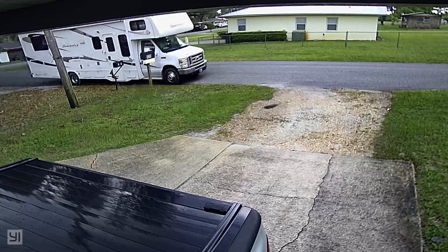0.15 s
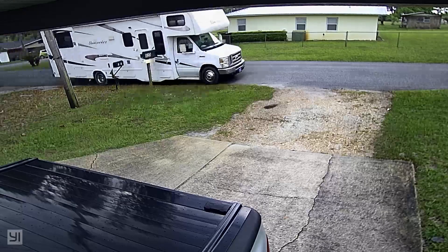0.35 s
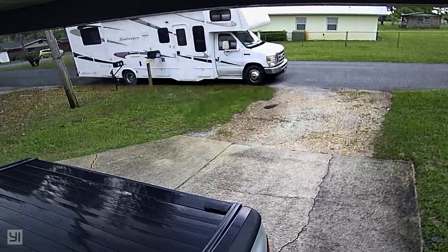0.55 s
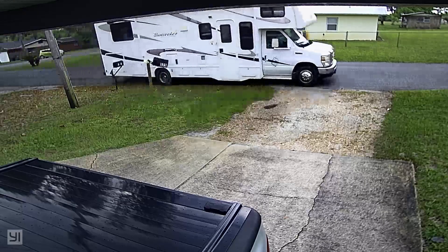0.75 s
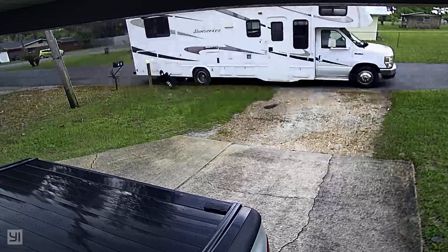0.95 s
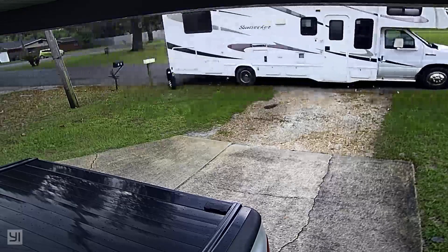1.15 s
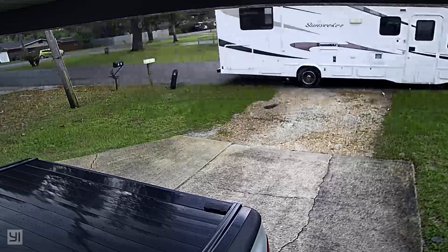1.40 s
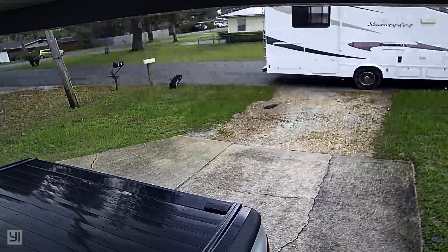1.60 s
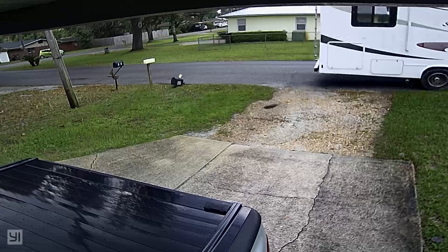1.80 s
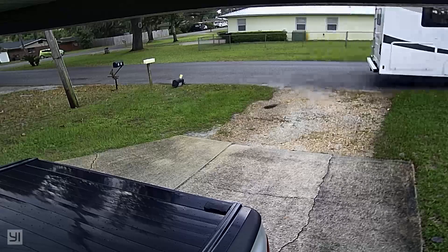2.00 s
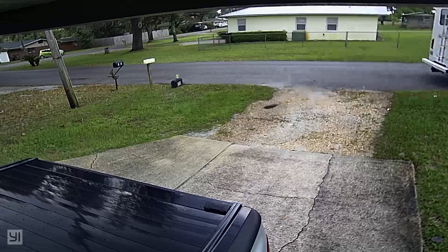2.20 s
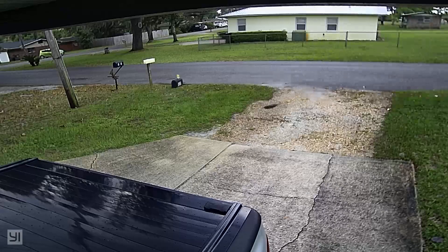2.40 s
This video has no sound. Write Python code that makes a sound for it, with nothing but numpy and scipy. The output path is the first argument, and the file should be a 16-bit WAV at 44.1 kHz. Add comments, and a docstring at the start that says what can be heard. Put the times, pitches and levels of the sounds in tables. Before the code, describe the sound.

A mailbox crash: engine and tyre noise is briefly heard, then from 0.2 to 0.4 seconds a motorhome hits with dense, crunching sheet-metal blows and a hollow boom. Gritty rattle and bright metallic clinks follow until 0.8. Wreckage lands near 1.05, fragments tick around 1.3, and it thuds again at 1.53 to 1.8. Tyre roar fades with faint hoots by 2.0, leaving quiet air, tiny ticks and a faint chirp at 2.5.

```python
"""A motorhome's engine and tyres come past, heard from a house across the lawn, over still outdoor air.
It clips a roadside mailbox: crackling bursts ring the sheet metal, and its panels boom and flex.
Loose parts ring as dying sines, then the wreck lands and tumbles among fragments and rattling grit.
The vehicle fades with two hoots, and a faint chirp follows in the distance.
Ground, walls, house fronts and trees echo the crash into a narrow-band microphone that rounds off peaks."""
import sys
import numpy as np
from scipy import signal
from scipy.io import wavfile
from scipy.ndimage import uniform_filter1d

SR = 44100
rng = np.random.default_rng(int(sys.argv[2]) if len(sys.argv) > 2 else 0)


def pcm_store(signal):
    """Save signal as 16-bit PCM."""
    levels = np.round(np.clip(np.atleast_2d(signal), -1, 1) * 32767)
    wavfile.write(sys.argv[1], SR, levels.astype(np.int16).T)


N = 112454
T = np.arange(N) / SR  # time in seconds

# The passing vehicle. Each row: time in seconds, engine level in dB, tyre level in dB.
PASS_LEVELS = [(0, -46, -52), (.2, -41, -54), (.6, -49.5, -46.5), (.95, -52, -48.5), (1.25, -54, -52),
               (1.38, -62, -49.5), (1.47, -52.5, -42.5), (1.62, -71, -46), (1.78, -82, -48.5),
               (1.9, -83.5, -54), (2.1, -70, -66), (2.55, -76.5, -76)]
# Colour of the engine. Each row: frequency in Hz, relative density in dB.
ENGINE_SPECTRUM = [(35, -89.5), (60, -54.5), (93, -27), (133, -14.5), (335, -2.5), (531, -11.5), (590, -5),
                   (774, -25), (1150, -6), (1360, -12.5), (1750, -7.5), (2610, -18.5), (3580, -20.5),
                   (7300, -35.5), (9000, -53), (11700, -68.5), (19800, -120)]
# Colour of the tyre roar. Each row: frequency in Hz, relative density in dB.
TYRE_SPECTRUM = [(60, -34), (130, -6), (300, -5.5), (460, -4.5), (575, 7.5), (690, -4.5), (820, 3.5),
                 (1030, 2.5), (1200, -7.5), (1400, -24), (1750, -14.5), (2200, -33), (4000, -29),
                 (7500, -26.5), (9000, -45)]
# Engine tones on the approach. Each row: mean pitch in Hz, level in dB at full strength.
ENGINE_TONES = [(335, -51.5), (608, -47.5)]
# Short hoots of resonance as the vehicle leaves. Each row: start in seconds, length in seconds,
# pitch in Hz, peak level in dB.
HOOTS = [(1.817, 0.065, 588, -47.5), (2.001, 0.048, 578, -52)]
# Colour of the outdoor air. Each row: frequency in Hz, relative density in dB.
AIR_SPECTRUM = [(35, -86), (60, -51.5), (145, -4), (266, -6), (314, -13), (440, -2.5), (488, -14),
                (975, -3.5), (2960, -16), (3970, -21.5), (7940, -27), (9000, -42.5), (11700, -82),
                (19800, -120)]
# Faint chirps in the distance. Each row: start in seconds, length in seconds, pitch in Hz, peak level in dB.
CHIRPS = [(2.529, 0.014, 2490, -57)]
# Rattling grit. Each row: time in seconds, level in dB.
GRIT_LEVELS = [(0, -57), (.13, -60.5), (.2, -53), (.45, -36), (.62, -43), (.82, -50), (.95, -52),
               (1.2, -53.5), (1.4, -52.5), (1.5, -51), (1.58, -85), (1.77, -74.5), (1.86, -65), (2.05, -76),
               (2.55, -85)]
# Colour of the grit. Each row: frequency in Hz, relative density in dB.
GRIT_SPECTRUM = [(100, -28.5), (900, -6.5), (1800, -3), (2400, 0.5), (3500, 3.5), (4300, -2), (5000, -8),
                 (7500, -4.5), (9000, -27.5)]
# Knocks on two loose metal parts. Each row: start in seconds, level in dB.
BRACKET_HITS = [(.575, -39.5), (.789, -36)]
ROD_HITS = [(.678, -36.5), (.719, -39)]
# Modes of those parts. Each row: pitch in Hz, relative level in dB, time to fall 60 dB in seconds.
BRACKET_MODES = [(2812, 0.5, 0.34), (2970, -19, .15), (3492, -1, 0.24), (4440, -12, 0.17), (7140, 0, .11)]
ROD_MODES = [(2639, 1.5, .35), (2670, -7, 0.24), (6780, -2, 0.16), (4027, -8, .15)]
# Small fragments falling on the road. Each row: start in seconds, level in dB, decay in seconds.
FRAGMENTS = [(1.204, -45, 0.0055), (1.262, -46, 0.003), (1.279, -44.5, 0.012), (1.291, -35.5, 0.0056),
             (1.421, -49, 0.017), (1.441, -48, 0.024), (1.642, -37, 0.0056), (1.676, -65, 0.0072),
             (1.778, -57, .025), (2.206, -68.5, 0.0046), (2.354, -63.5, .004), (2.467, -63, .004)]
# Colour of a fragment. Each row: frequency in Hz, relative density in dB.
FRAGMENT_SPECTRUM = [(100, -34), (1200, -12), (2500, -18), (3900, 0), (5000, -16), (7400, -12), (9000, -34)]
# The vehicle strikes the box. Each row: start in seconds, level in dB before the shelves,
# crunch decay in seconds, bass shelf in dB, treble shelf in dB.
BLOWS = [(.209, -29.5, 0.0077, -5, 1), (.215, -17.5, 0.016, -6.5, 6), (.231, -13.5, .017, -8.5, -8),
         (.253, -24.5, 0.024, 0, 3), (.291, -20, 0.0061, -2, 4.5), (.299, -11.5, 0.0031, -9.5, 0.5),
         (.308, -13, 0.013, -3, -2.5), (.332, -19, 0.037, 0.5, 1), (.363, -20, 0.037, -1, -0.5),
         (.418, -38, 0.021, 3.5, -7.5), (.47, -31, 0.051, -4.5, -5), (.566, -28, 0.0058, -14, -12),
         (.637, -37.5, 0.023, -2.5, -0.5), (.668, -35.5, 0.035, -18, -0.5), (.752, -37, 0.024, -15, 8),
         (.768, -32, 0.023, -11, -10)]
# Colour of the crunch. Each row: frequency in Hz, relative density in dB.
CRUNCH_SPECTRUM = [(60, -49.5), (130, -16), (260, -9.5), (340, -6.5), (480, -2.5), (600, -4), (745, -10),
                   (1130, -3.5), (1300, -7), (1750, -1), (2050, -3), (2600, -8.5), (3800, -6),
                   (4600, -14.5), (5700, -14.5), (7100, -12), (8100, -20.5), (9000, -42.5)]
# The wreck hits the ground and tumbles. Each row: start in seconds, level in dB before the shelves,
# decay in seconds, bass shelf in dB, treble shelf in dB.
LANDINGS = [(1.042, -34, 0.0037, -1, 0.5), (1.048, -34.5, 0.018, -5, 1), (1.057, -38.5, 0.054, 7, -0.5),
            (1.074, -43, 0.038, -4.5, -5), (1.175, -51.5, 0.022, 10.5, 10.5), (1.529, -35, 0.0055, -5, -8),
            (1.5445, -28.5, 0.0036, -0.5, -7.5), (1.603, -43, 0.0023, 14, -22),
            (1.662, -40.5, 0.012, 2.5, -4.5), (1.799, -44, 0.023, 13.5, -2)]
# Colour of a landing. Each row: frequency in Hz, relative density in dB.
THUD_SPECTRUM = [(60, -37), (140, -18.5), (320, -4), (400, -7), (560, -2), (760, -11), (900, -2.5),
                 (1130, -2), (1400, -10.5), (1780, -5), (2500, -8.5), (3700, -7), (5000, -14.5),
                 (7300, -12.5), (9000, -34.5)]
# Sheet metal of the box. Each row: pitch in Hz, relative level in dB, time to fall 60 dB in seconds.
BOX_MODES = [(482.3, -7, 0.64), (543, -2, 0.4), (969, 0.5, 0.4), (1196, -0.5, 0.28), (1310, -5.5, 0.18),
             (1650, -13, 0.14), (1700, -19, 0.46), (1758.4, -1.5, .6), (1861, 12, 0.12), (2260, -0.5, 0.12),
             (2498, -12.5, 0.27), (2930, -14, 0.12), (3450, -19.5, 0.11), (3703, -3, 0.1)]
# The dented wall flexes. Each row: start in seconds, level in dB before swell and decay, pitch in Hz.
FLEXES = [(.238, -23, 444), (.405, -21, 440.4), (.45, -37, 467)]
# The broad panel gives way. Each row: start in seconds, level in dB applied to the panel modes.
BOOMS = [(.331, -21.5), (0.344, -15)]
# Modes of that panel. Each row: pitch in Hz, relative level in dB, time to fall 60 dB in seconds.
PANEL_MODES = [(263.5, 4, 0.12), (301.5, -5, .17), (226, -9.5, 0.16), (378, -14.5, 0.18), (462.6, -17, 0.3)]
# Echoes off the ground and nearby walls. Each row: delay in seconds, level in dB.
WALL_ECHOES = [(.0031, -17), (.0083, -15), (.017, -19.5)]
# Echo decay of the yard. Each row: frequency in Hz, time to fall 60 dB in seconds.
YARD_DECAY = [(100, 0.3), (300, 0.55), (1000, 0.35), (2000, 0.77), (4000, 0.29), (8000, 0.41)]

TONE_WAVER = .008  # rms pitch wander as a fraction of the pitch
AIR_DB = -65
ATTACK_S, FRAGMENT_RISE_S, PANEL_RISE_S = .0015, .0017, .0088
CRACKS_PER_S = 1500  # average rate within a contact
BASS_HZ, TREBLE_HZ = 450, 3500  # shelf corners
OVERTONE_LOW_HZ, OVERTONE_HIGH_HZ, OVERTONE_T60_S = 700.2, 7694, .22
RING_DB, OVERTONES_DB = -18.5, -25
FLEX_T60_S = .22
WALL_DULL_HZ, YARD_DB = 5000, -12
EDGE_HZ = 8900  # upper edge of the microphone's band
DIP_S, DIP_WIDTH_S, DIP_DB = .1425, .0045, -13.5  # centre, half-width and depth of a level dip


def amp(db):
    """Amplitude from decibels."""
    return 10 ** (np.asarray(db) / 20)


def unit(x):
    """Scale to an rms of one."""
    return x / np.sqrt(np.mean(x ** 2) + 1e-20)


def read(points, hz):
    """Read a table of values along a logarithmic frequency axis."""
    f, value = np.transpose(points)
    return np.interp(np.log(hz + 1), np.log(f + 1), value)


def level(table, axis=1):
    """Gain over time from one dB column of a curve."""
    rows = np.array(table)
    return amp(np.interp(T, rows[:, 0], rows[:, axis]))


def add(mix, start_s, sound):
    """Mix a sound in place from its start time, cut at the end of the scene."""
    part = mix[round(start_s * SR):][:len(sound)]
    part += sound[:len(part)]


def colour(x, spectrum, bass_db=0, treble_db=0):
    """Minimum-phase filter, set to unit energy before a shelf is added at each end."""
    hz = abs(np.fft.fftfreq(4096, 1 / SR))
    rolloff = np.where(hz > EDGE_HZ, EDGE_HZ / (hz + 1), 1) ** 2
    gain = unit(amp(read(spectrum, hz)) * rolloff)
    bass = bass_db / (1 + (hz / BASS_HZ) ** 4)
    treble = treble_db * (1 - 1 / (1 + (hz / TREBLE_HZ) ** 4))
    gain = gain * amp(bass + treble)
    # The Hilbert transform of the log gain gives the phase that makes the filter causal.
    response = np.exp(np.conj(signal.hilbert(np.log(gain + 1e-6))))
    taps = np.fft.ifft(response).real
    return signal.fftconvolve(x, taps[:len(taps) // 2])[:len(x)]


def crackle(size, per_s, spread_db, hiss):
    """Random cracks of uneven size over a fine rasp."""
    heights = amp(spread_db * np.minimum(rng.exponential(1, size), 3))
    heights = heights * rng.choice([-1, 1], size)
    cracks = heights * (rng.random(size) < per_s / SR)
    return unit(unit(cracks) + hiss * rng.standard_normal(size))


def burst(level_db, decay_s, hiss, rise_s=ATTACK_S):
    """One contact: a quick rise and a dying run of cracks."""
    t = T[:SR // 2]
    rise = 1 - np.exp(-t / rise_s)
    fall = np.exp(-(t / decay_s) ** 1.286 / 2)
    return amp(level_db) * rise * fall * crackle(len(t), CRACKS_PER_S, spread_db=2.5, hiss=hiss)


def ring(modes):
    """Dying sines of a struck object."""
    t = T[:SR]
    return sum(amp(db - 60 * t / t60) * np.sin(2 * np.pi * hz * t) for hz, db, t60 in modes)


def blip(length_s, hz, db):
    """A short tone that swells and fades."""
    t = T[T < length_s]
    return amp(db) * np.sin(np.pi * t / length_s) ** 2 * np.sin(2 * np.pi * hz * t)


def vehicle():
    """The engine leads, with two wavering tones; gritty tyre roar follows and hoots as it fades."""
    engine = colour(crackle(N, 900, spread_db=1, hiss=1), ENGINE_SPECTRUM)
    drive = level(PASS_LEVELS, axis=1)
    tones = np.zeros(N)
    for hz, db in ENGINE_TONES:
        waver = unit(uniform_filter1d(rng.standard_normal(N), size=1500))
        pitch_hz = hz * (1 + TONE_WAVER * waver)
        tones += amp(db) * np.sin(2 * np.pi * np.cumsum(pitch_hz) / SR)
    # The tones fade once the engine falls below its opening level.
    tone_fade = np.minimum(drive / drive[0], 1) ** 2
    roar = colour(crackle(N, 500, spread_db=5, hiss=1.0), TYRE_SPECTRUM)
    tyres = level(PASS_LEVELS, axis=2) * roar
    for start_s, *hoot in HOOTS:
        add(tyres, start_s, blip(*hoot))
    return drive * engine + tones * tone_fade + tyres


def background():
    """Still outdoor air, made of coloured noise, with a faint chirp."""
    air = amp(AIR_DB) * colour(rng.standard_normal(N), AIR_SPECTRUM)
    for start_s, *chirp in CHIRPS:
        add(air, start_s, blip(*chirp))
    return air


def debris():
    """A spray of grit and falling fragments, both crackling, with loose parts ringing at their modes."""
    grit = colour(crackle(N, 970, spread_db=3, hiss=0.96), GRIT_SPECTRUM)
    out = level(GRIT_LEVELS) * grit
    for hits, modes in (BRACKET_HITS, BRACKET_MODES), (ROD_HITS, ROD_MODES):
        for start_s, db in hits:
            add(out, start_s, amp(db) * ring(modes))
    for start_s, db, decay_s in FRAGMENTS:
        fragment = burst(db, decay_s, hiss=.6, rise_s=FRAGMENT_RISE_S)
        add(out, start_s, colour(fragment, FRAGMENT_SPECTRUM))
    return out


def mailbox():
    """Crunching blows and landings, all ringing the same sheet metal; its panels boom and flex."""
    crunch = np.zeros(N)
    for table, spectrum in (BLOWS, CRUNCH_SPECTRUM), (LANDINGS, THUD_SPECTRUM):
        for start_s, db, decay_s, bass_db, treble_db in table:
            contact = burst(db, decay_s, hiss=0.84)
            add(crunch, start_s, colour(contact, spectrum, bass_db, treble_db))
    # Many weak modes of the crumpled metal, unevenly spaced.
    pitches = np.geomspace(OVERTONE_LOW_HZ, OVERTONE_HIGH_HZ, 48) * rng.uniform(.97, 1.03, 48)
    overtones = [(hz, 0, OVERTONE_T60_S) for hz in pitches]
    out = crunch.copy()
    for metal, db in (ring(BOX_MODES), RING_DB), (ring(overtones), OVERTONES_DB):
        out += amp(db) * signal.fftconvolve(crunch, metal / np.linalg.norm(metal))[:N]
    swell = 1 - np.exp(-(T[:SR] / PANEL_RISE_S) ** 2)
    for start_s, db in BOOMS:
        add(out, start_s, amp(db) * ring(PANEL_MODES) * swell)
    for start_s, db, hz in FLEXES:
        add(out, start_s, ring([(hz, db, FLEX_T60_S)]) * swell)
    return out


def walls(x):
    """The direct sound and a few early, duller copies from the ground and nearby walls."""
    out = x.copy()
    dull = signal.sosfilt(signal.butter(1, WALL_DULL_HZ, fs=SR, output="sos"), x)
    for delay_s, db in WALL_ECHOES:
        add(out, delay_s, amp(db) * dull)
    return out


def yard(x):
    """Scattered echoes from house fronts and trees, each band dying at its own speed."""
    arrivals = rng.choice([-1., 1.], SR) * (rng.random(SR) < 2000 / SR)  # about 2000 a second
    taps = arrivals * np.minimum(T[:SR] / 0.014, 1)  # builds up over 14 ms
    hz, t, bands = signal.stft(taps, SR, nperseg=256)
    decay = amp(-60 * t / read(YARD_DECAY, hz)[:, None])
    tail = signal.istft(bands * decay, SR, nperseg=256)[1]
    return signal.fftconvolve(x, tail / np.linalg.norm(tail))[:N]


def scene():
    """The crash and its echoes over the passing vehicle and the outdoor air."""
    crash = mailbox() + debris()
    echoing = walls(crash) + amp(YARD_DB) * yard(crash)
    return (echoing + vehicle() + background())[None]


def record(dry):
    """A small microphone rounds off peaks, dips briefly in level, and loses deep bass and high treble."""
    rounded = .6 * np.tanh(dry / 0.61)
    dip = amp(DIP_DB * np.exp(-abs((T - DIP_S) / DIP_WIDTH_S) ** 4))
    thin = signal.sosfilt(signal.butter(6, 105, "high", fs=SR, output="sos"), rounded * dip)
    band_limit = signal.firwin(255, EDGE_HZ, window=("kaiser", 9), fs=SR)
    return signal.oaconvolve(thin, band_limit[None], "same")


dry = scene()
out = record(dry)
pcm_store(out)
```